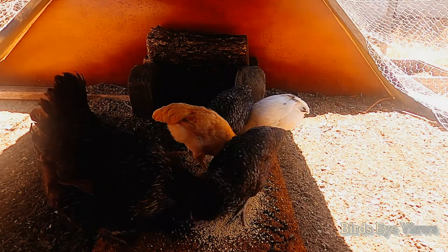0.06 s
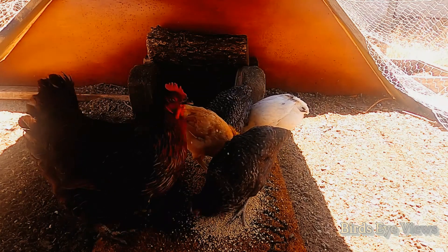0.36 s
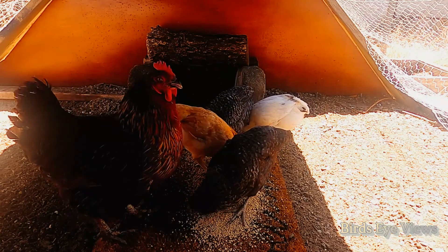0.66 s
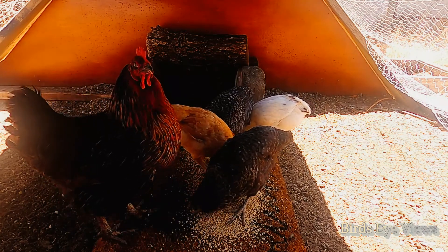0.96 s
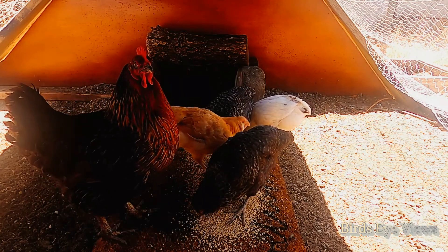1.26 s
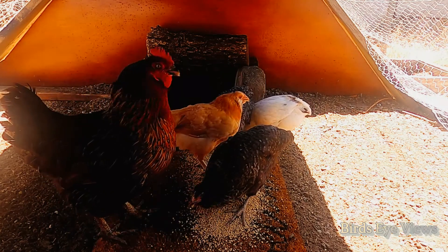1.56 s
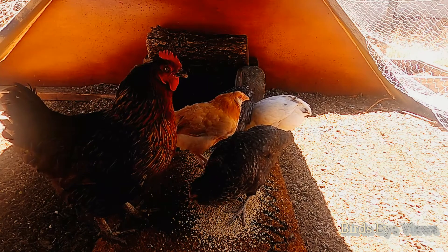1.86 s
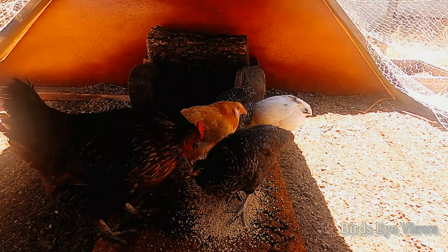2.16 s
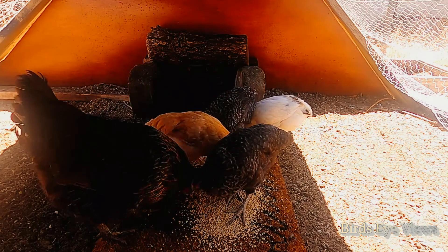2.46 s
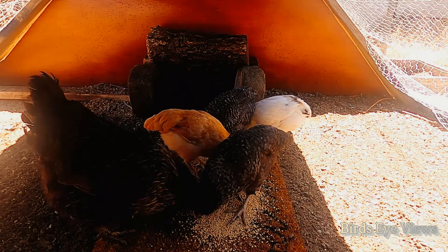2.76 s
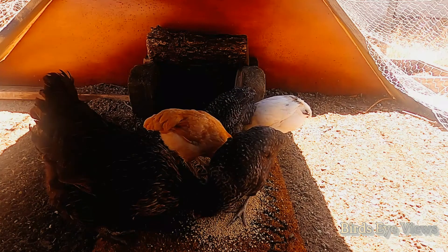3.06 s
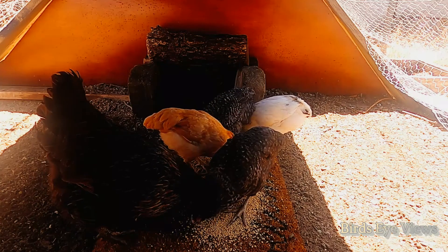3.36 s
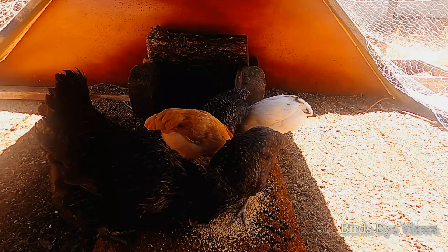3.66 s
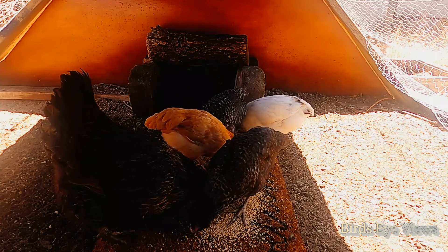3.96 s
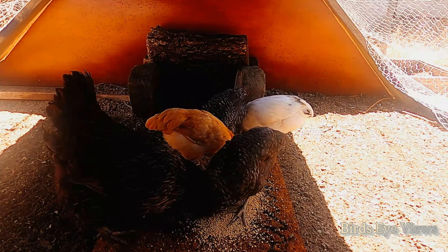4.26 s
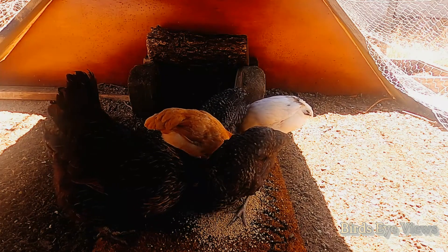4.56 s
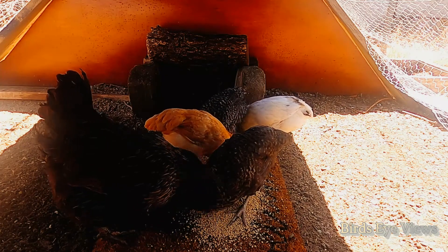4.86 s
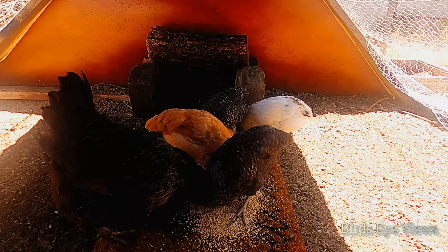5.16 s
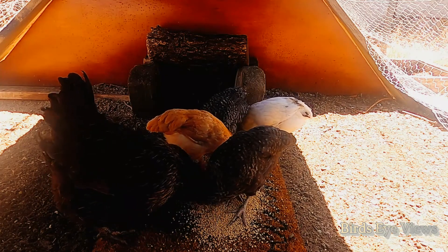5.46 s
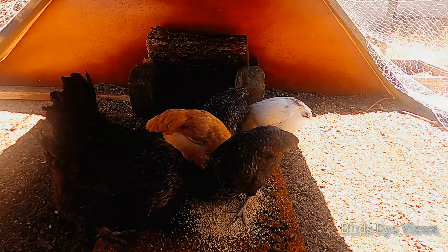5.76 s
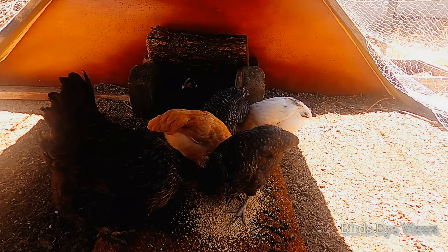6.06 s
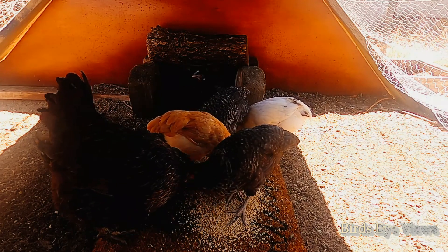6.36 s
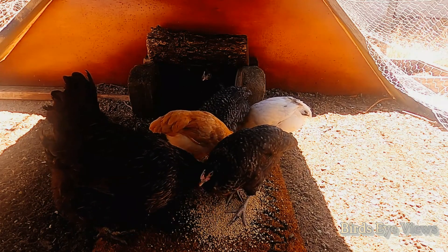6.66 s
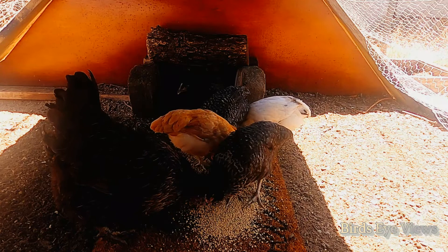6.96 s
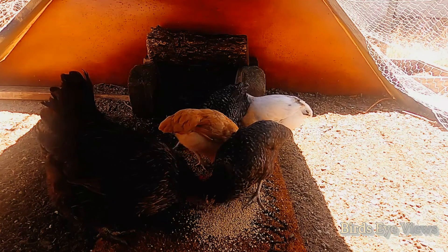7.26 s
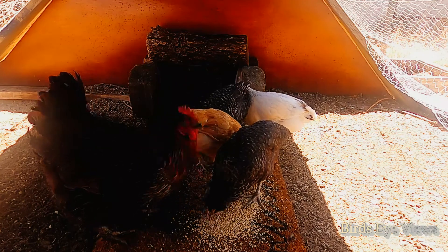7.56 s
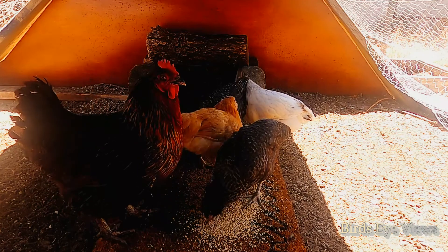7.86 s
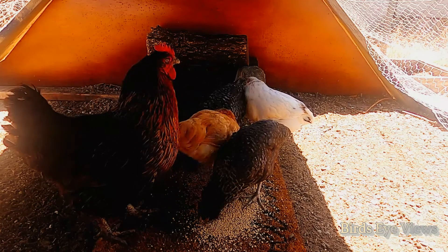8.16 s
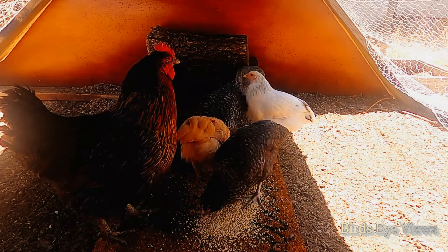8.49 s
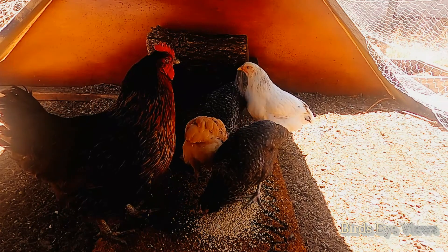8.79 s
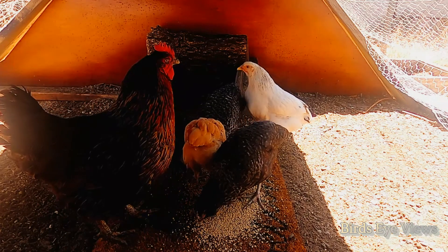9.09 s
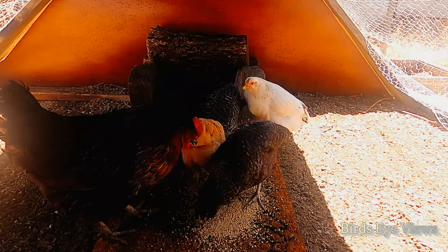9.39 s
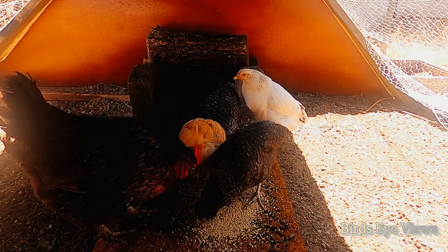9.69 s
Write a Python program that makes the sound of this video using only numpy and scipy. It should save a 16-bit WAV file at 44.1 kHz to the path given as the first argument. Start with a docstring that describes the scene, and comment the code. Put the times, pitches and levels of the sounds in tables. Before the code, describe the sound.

A hen and her half-grown chicks feed in a small outdoor shelter, over a steady low rumble. The hen, close by, opens with two short falling pips, the second, at 0.5 seconds, the loudest. Until about 4 seconds a softer chick, farther in and slightly echoing, alternates falling slurs with rising whistles. The hen gives a raspy pip at 4.3 seconds and another pip at 6. Level whistles and quavering murmurs fill 4.5 to 6.5 seconds, followed by a run of sinking, sigh-like chick notes around 7. A beak knocks on the hollow feeder at 7.7 seconds. From 8 seconds to the end, near 10, a chick repeats quick upturned notes, while the hen pips three times around 8 to 8.5 and once more at 9.6. Sharp peeps, chirps, light beak ticks and faint scratching of feet in grit are scattered throughout.

```python
"""A hen and her half-grown chicks feed under a tarp shelter that smears every call, over a low rumble.
The hen opens with two short falling pips; for four seconds a chick alternates slurs and rising whistles.
A rasping pip follows, then level whistles, quavering murmurs and, near 7 s, a run of sinking sighs.
A beak knocks hard on the feeder, and the hen pips on through a closing run of quick upturned notes.
Sharp peeps, chirps, beak ticks and feet scratching the grit are scattered throughout."""
import sys
import numpy as np
from scipy import signal
from scipy.fft import rfft, irfft, next_fast_len
from scipy.io import wavfile
from scipy.ndimage import uniform_filter1d

SR = 44100
rng = np.random.default_rng(int(sys.argv[2]) if len(sys.argv) > 2 else 0)


def generate_wav(sig):
    """Save sig (samples, or channels by samples) to the path in sys.argv[1] as 16-bit PCM at SR."""
    pcm = np.round(np.clip(np.atleast_2d(sig).T, -1, 1) * 32767).astype(np.int16)
    wavfile.write(sys.argv[1], SR, pcm)


N = 433503
T = np.arange(N) / SR
SHARE = np.linspace(0, 1, 100)  # position along a call, as a share of its length
LEFT_LAG_S = 5.5e-5  # sound arrives on the right first

# spectrum of the outdoor air: frequency_hz, density_db
AIR_SPECTRUM = [(20, -20.5), (30, -7.5), (45, -4.5), (62, -3), (79, 2), (97, -3), (120, -5), (160, -14),
                (220, -22.5), (350, -31.5), (700, -31), (980, -24), (1200, -29), (1600, -29.5), (2200, -36),
                (3300, -42.5), (5000, -53.5), (7000, -55), (10000, -78), (15000, -80)]
# likeness of the air's sound on left and right: frequency_hz, coherence_ratio
AIR_COHERENCE = [(60, 1), (150, 0.95), (350, 0.72), (860, 0.55), (2080, 0.46), (5060, 0.02)]
# slow course of the rumble: time_s, level_db
RUMBLE_LEVELS = [(0.0, -48), (0.24, -47.5), (4.02, -46.5), (7.09, -49.5), (7.2, -47), (9.83, -48.5)]
# slow course of the hush: time_s, level_db
HUSH_LEVELS = [(0.0, -64.5), (2.6, -65), (3.37, -62.5), (6.65, -68.5), (7.47, -66), (9.83, -69)]
# reflections from walls and ground: delay_s, left_db, right_db
ECHOES = [(.0042, -13.5, -24.5), (.0095, -16, -14), (0.0117, -6.5, -9), (.023, -23.5, -26.5)]
# reverberation time of the shelter: frequency_hz, t60_s
SHELTER_DECAY = [(300, 0.69), (1300, 0.47), (3000, 0.36), (5000, 0.27), (10000, 0.2)]
# spectrum of stirring litter: frequency_hz, gain_db
LITTER_SPECTRUM = [(500, -8), (3000, 3), (8000, 1.5), (11000, -9), (14000, -13)]
# dull shuffles on packed earth: start_s, level_db
SHUFFLES = [(1.56, -67), (2.73, -64), (2.98, -60.5), (3.58, -64), (4.58, -64.5), (5.679, -61)]
# spectrum of scuffed earth: frequency_hz, gain_db
EARTH_SPECTRUM = [(100, -21.5), (290, 0), (480, -5.5), (700, -12), (1500, -10), (6000, -60)]
# feet in the grit: start_s, length_s, level_db
SCRATCHES = [(0.85, 0.046, -76), (2.716, 0.084, -70), (4.584, 0.065, -73.5), (5.068, 0.041, -73),
             (5.593, 0.13, -77.5), (6.466, 0.076, -74), (6.991, 0.14, -74), (7.162, 0.042, -81),
             (7.318, 0.083, -75), (7.653, 0.053, -72), (8.03, 0.037, -64.5), (8.566, 0.036, -76)]
# spectrum of ticks and scratches: frequency_hz, gain_db
GRIT_SPECTRUM = [(200, -13), (700, 10.5), (2500, 7), (5000, 5), (7500, -0.5), (10000, -6), (14000, -19.5)]
# beak knocks on the feeder: start_s, level_db, ring_ratio
PECKS = [(.697, -64, 0.039), (1.08, -61, 0.045), (1.512, -54.5, .05), (4.597, -59, 0.34),
         (7.2069, -57, 1.36), (7.34, -55.5, .05), (7.717, -48.5, 0.29), (8.127, -62, 0.26)]
# modes of the hollow feeder: frequency_hz, gain_db, t60_s
FEEDER_MODES = [(520, -13, 0.036), (947, 6, 0.031), (1090, 8.5, 0.029), (1230, 1, 0.048), (2300, -14, .025)]
# spectrum of the breath in a chick's call: frequency_hz, gain_db
BREATH_SPECTRUM = [(100, -24), (280, -5.5), (500, 1.5), (750, 1), (1200, 5), (3000, 3.5), (4800, -12),
                   (6000, -13), (9000, -29.5), (14000, -47.5)]
# falling slurs: start_s, level_db
SLURS = [(.405, -62.5), (0.955, -66), (1.565, -63.5), (2.14, -62.5), (2.714, -59.5), (3.348, -54),
         (4.034, -65.5)]
# long rising whistles: start_s, top_pitch_hz, level_db
RISES = [(.56, 3160, -63.5), (1.106, 3160, -59.5), (1.722, 3176, -61), (2.288, 3200, -55.5),
         (2.878, 3265, -51.5), (3.506, 3195, -53), (4.06, 3040, -61.5)]
# low quavering murmurs: start_s, level_db
MURMURS = [(5.275, -53.5), (5.655, -58), (6.048, -63.5), (6.45, -62.5)]
# sinking sighs: start_s, level_db
SIGHS = [(6.697, -59.5), (6.925, -59.5), (7.153, -64), (7.39, -64), (7.637, -64), (7.897, -59)]
# level notes that flick up at the end: start_s, level_db
HOOKS = [(8.149, -59), (8.317, -57.5), (8.484, -60), (8.67, -52), (8.833, -53), (9.017, -53),
         (9.203, -51.5), (9.388, -54), (9.568, -55), (9.785, -56)]
# sharp peeps: start_s, top_pitch_hz, level_db
PEEPS = [(0.089, 5140, -61), (1.499, 4730, -63), (1.991, 5260, -62), (2.996, 4880, -60.5),
         (3.421, 5200, -60.5), (5.024, 5350, -56.5), (6.46, 5150, -55), (7.911, 5090, -53.5),
         (9.116, 5230, -54)]
# level whistles: start_s, length_s, pitch_hz, level_db
WHISTLES = [(.295, 0.052, 3480, -57.5), (.392, 0.047, 4290, -52.5), (2.199, 0.076, 4000, -62.5),
            (4.46, 0.082, 2500, -60), (4.555, 0.056, 4450, -64), (4.562, 0.097, 3120, -54),
            (4.783, 0.044, 4440, -61.5), (4.898, 0.054, 2438, -56.5), (5.022, 0.047, 3230, -52.5),
            (5.504, 0.086, 4380, -54.5), (5.884, 0.13, 4445, -59.5), (5.983, 0.047, 2865, -59),
            (6.283, 0.12, 4460, -59.5), (9.31, .16, 3340, -66), (9.49, 0.096, 3366, -66),
            (9.69, .08, 3390, -72.5)]
# louder chirps: start_s, length_s, top_pitch_hz, level_db
CHIRPS = [(-.01, 0.095, 3734, -58.5), (.022, 0.054, 2937, -55), (.785, 0.052, 4710, -69.5),
          (1.304, 0.067, 4580, -64), (1.648, 0.039, 4210, -66), (1.79, .064, 4380, -61),
          (2.27, 0.077, 3950, -65.5), (2.71, 0.064, 4600, -65), (2.724, 0.079, 3680, -70),
          (3.329, 0.043, 4630, -66.5), (3.489, 0.051, 4080, -56.5), (3.635, 0.066, 4520, -64.5),
          (3.71, 0.051, 4470, -62.5), (3.874, 0.046, 4360, -57.5), (3.906, 0.041, 3460, -59.5),
          (4.016, 0.067, 4410, -60.5), (4.209, 0.052, 4400, -62.5), (4.329, 0.052, 4380, -60),
          (4.916, 0.058, 4100, -69), (4.928, 0.043, 3340, -55.5), (5.075, 0.067, 4180, -59),
          (5.298, .06, 4050, -61.5), (5.509, 0.066, 3970, -63.5), (5.7, 0.06, 4200, -68),
          (5.87, 0.072, 4460, -68), (6.23, 0.17, 4290, -66.5), (7.251, 0.053, 4140, -69),
          (7.999, 0.028, 4090, -61.5), (8.689, 0.17, 4610, -71.5), (8.951, 0.055, 4010, -60.5),
          (9.19, 0.066, 3920, -62), (9.349, 0.1, 4320, -69)]
# the hen's pips: start_s, length_s, open_hz, close_hz, level_db, open_rasp_ratio, close_rasp_ratio
PIPS = [(0.062, 0.034, 1560, 1476, -35.5, .3, 0.03), (0.475, 0.038, 1692, 1307, -28, 0.22, 0.24),
        (4.325, 0.041, 1580, 1336, -38.5, 0.98, 0.94), (5.977, 0.036, 1570, 1414, -40.5, .15, 0.21),
        (7.84, 0.061, 1244, 1186, -39, .12, 0.35), (8.018, .044, 1776, 1406, -35.5, 0.41, 0.18),
        (8.47, 0.082, 1425, 1166, -43, 0.72, 0), (9.576, 0.063, 1399, 1366, -39.5, 0.18, 0.14)]
# the hen's harmonics, from the second upward: gain_db
HEN_OVERTONES = [-30, -42, -44, -48]


def amp(db):
    """Amplitude grows tenfold for every 20 dB."""
    return 10 ** (np.asarray(db) / 20)


def unit(x):
    """Normalisation to an rms of 1."""
    return x / np.sqrt(np.mean(x ** 2) + 1e-20)


def read(points, hz):
    """Interpolation of a table on a logarithmic frequency axis."""
    f, value = np.transpose(points)
    return np.interp(np.log(hz + 1), np.log(f + 1), value)


def add(mix, start_s, sound):
    """Superposition: a sound sums into the mix from its start time."""
    at = round(start_s * SR)
    sound = sound[max(-at, 0):]
    part = mix[max(at, 0):][:len(sound)]
    part += sound[:len(part)]


def wander(size, hz):
    """Low-passed noise: smooth random motion of rms about 1 that rolls off near hz."""
    f = np.fft.rfftfreq(16384, 1 / SR)
    return unit(irfft(rfft(rng.standard_normal(16384)) * np.exp(-(f / hz) ** 2)))[:size]


def colour(x, points):
    """Linear filtering: the spectrum is multiplied by a table's gain curve."""
    size = next_fast_len(N)
    return irfft(rfft(x, size) * amp(read(points, np.fft.rfftfreq(size, 1 / SR))), size)[..., :N]


def outdoors(hush_db=1, gust_db=2, buffet=0.54):
    """Partly coherent noise, split at 300 Hz into a lumpy rumble and a faint hush."""
    size = next_fast_len(N)
    hz = np.fft.rfftfreq(size, 1 / SR)
    common, separate = rfft(rng.standard_normal((2, size)))
    # the lowest buffeting differs between the two sides
    coherence = np.clip(read(AIR_COHERENCE, hz) - buffet * np.exp(-(hz / 35) ** 2), 0, 1)
    left = common * np.exp(-2j * np.pi * hz * LEFT_LAG_S)
    right = coherence * common + np.sqrt(1 - coherence ** 2) * separate
    air = np.array([left, right]) * amp(read(AIR_SPECTRUM, hz))
    low = 1 / (1 + (hz / 300) ** 6)
    rumble, hush = (irfft(air * band, size)[:, :N] for band in (low, 1 - low))
    midband_rms = irfft(air[0] * (hz > 400) * (hz < 1100), size).std()
    gust_band = (hz > 2) * np.exp(-(hz / 9) ** 2)
    gusts = unit(irfft(rfft(rng.standard_normal(size)) * gust_band, size))[:N]
    rumble_gain = amp(gust_db * gusts + np.interp(T, *np.transpose(RUMBLE_LEVELS)))
    hush_gain = amp(hush_db + np.interp(T, *np.transpose(HUSH_LEVELS)))
    return unit(rumble) * rumble_gain + hush / midband_rms * hush_gain


def shelter(x, wet_db, left_db, scatter_db, scatter_s=0.012):
    """Convolution with direct sound, wall echoes, scatter off the clutter and a short diffuse tail."""
    size = SR // 2
    t = np.arange(size) / SR
    hz, frame_s, spectra = signal.stft(rng.standard_normal((2, size)) * (t > .006), SR, nperseg=256)
    decay = amp(-60 * frame_s / read(SHELTER_DECAY, hz)[:, None])
    tail = signal.istft(spectra * decay, SR, nperseg=256)[1][:, :size]
    scatter = rng.standard_normal((2, size)) * np.exp(-t / scatter_s) * (t > .001)
    response = (amp(wet_db) * unit(tail) + amp(scatter_db) * unit(scatter)) / np.sqrt(size)
    response[[0, 1], [round(LEFT_LAG_S * SR), 0]] += 1  # direct path
    for delay_s, *sides_db in ECHOES:
        response[:, round(delay_s * SR)] += amp(sides_db)
    return signal.oaconvolve(x[None], response, axes=1)[:, :N] * amp([[left_db / 2], [-left_db / 2]])


def rustle(grains_per_s=740, level_db=-91, swell_db=1.5):
    """Shot noise: fine grains of litter stir under the birds in slow clumps."""
    grains = rng.standard_normal(N) * (rng.random(N) < grains_per_s / SR)
    clumps = unit(uniform_filter1d(rng.standard_normal(N), size=6000))
    return amp(level_db) * unit(colour(grains * amp(swell_db * clumps), LITTER_SPECTRUM))


def shuffling():
    """Friction noise: feet push the soil in short soft scuffs."""
    push = np.zeros(N)
    scuff = np.hanning(int(.12 * SR))
    for start_s, db in SHUFFLES:
        add(push, start_s, amp(db) * scuff)
    return push * unit(colour(rng.standard_normal(N), EARTH_SPECTRUM))


def feeding(grit_per_s=1200, strays_per_s=7, stray_db=-80):
    """Impact excitation: beaks ring the feeder's damped modes, feet shift grit and stray grains drop."""
    ticks, rings = np.zeros(N), np.zeros(N)
    t = np.arange(4096) / SR
    snap = np.exp(-t / .0022)
    ring = sum(amp(db - 60 * t / t60) * np.sin(2 * np.pi * hz * t) for hz, db, t60 in FEEDER_MODES)
    for start_s, db, ring_ratio in PECKS:
        add(rings, start_s, amp(db) * ring_ratio * ring)
        add(ticks, start_s, amp(db) * snap * rng.standard_normal(len(t)))
    for start_s, length_s, db in SCRATCHES:
        size = int(length_s * SR)
        grains = rng.standard_normal(size) * (rng.random(size) < grit_per_s / SR)
        add(ticks, start_s, amp(db) * unit(grains * np.hanning(size)))
    drops = rng.random(N) < strays_per_s / SR
    strays = drops * amp(stray_db + 2 * np.minimum(rng.exponential(3.0, N), 5))
    ticks += signal.oaconvolve(strays, snap * rng.standard_normal(len(t)))[:N]
    return colour(ticks, GRIT_SPECTRUM) + rings


def glide(turn, scoop, slide, ease):
    """Pitch contour: a factor that reaches 1 at the share turn, then slides off, early if ease < 1."""
    before = np.maximum(1 - SHARE / turn, 0)
    after = np.maximum((SHARE - turn) / (1 - turn), 0)
    return 1 - scoop * before ** 2 + slide * after ** ease


def swell(attack, release, start_db, end_db):
    """Amplitude envelope in dB, with attack and release as shares of the call's length."""
    onset = np.maximum(1 - SHARE / attack, 0)
    ending = np.maximum(1 - (1 - SHARE) / release, 0)
    return start_db * onset ** 2 + end_db * ending ** 2


def chick(calls, bend, swell_db, jitter, flutter_db, rough, breath_db, octave_db, quaver=.015):
    """Frequency and amplitude modulation: whistles waver about one contour, with breath noise."""
    lead_s, lead_db = .03, -12  # the voice builds up faintly and unsteadily before the note
    voice, envelope = np.zeros((2, N))
    for start_s, length_s, hz, db in calls:
        t = np.arange(-lead_s, length_s, 1 / SR)
        size = len(t)
        early = np.clip(-t / lead_s, 0, 1)
        contour = uniform_filter1d(np.interp(t / length_s, SHARE, bend), size=200)
        waver = jitter * wander(size, 200) + (quaver + 0.0407 * early) * wander(size, 29.6)
        phase = 2 * np.pi * np.cumsum(hz * contour * (1 + waver)) / SR
        effort_db = db + np.interp(t / length_s, SHARE, swell_db) + lead_db * early
        level = amp(effort_db + flutter_db * wander(size, 70)) * signal.windows.tukey(size, .15)
        tone = np.sin(phase) * (1 + rough * wander(size, 620)) + amp(octave_db) * np.sin(2 * phase)
        add(voice, start_s - lead_s, level * unit(tone))
        add(envelope, start_s - lead_s, level)
    breath = unit(colour(rng.standard_normal(N), BREATH_SPECTRUM))
    return voice + amp(breath_db) * breath * envelope


def twitter(per_s=0.86, length_s=.06, pitch_hz=4260, spread=0.14, level_db=-72):
    """Uniform scatter in time and pitch: rows like CHIRPS for further, fainter chirps."""
    draws = rng.random((round(per_s * N / SR), 2))
    return [(when * N / SR, length_s, pitch_hz * (1 + spread * (2 * height - 1)), level_db)
            for when, height in draws]


def repeated(notes, length_s, pitch_hz):
    """Repetition of one note: rows of start_s, length_s, pitch_hz, level_db."""
    return [(start_s, length_s, pitch_hz, db) for start_s, db in notes]


def soft_calls(rise_s=.18):
    """Gliding tones near 3 kHz: the contented low whistling of the feeding chicks."""
    slurs = chick(repeated(SLURS, length_s=.088, pitch_hz=2817),
                  glide(turn=.122, scoop=.0217, slide=-.22, ease=.8),
                  swell(attack=.35, release=.23, start_db=-8, end_db=-5.5),
                  jitter=.035, flutter_db=4.5, rough=.37, breath_db=-5.5, octave_db=-47.5)
    hushed_db = -6.5 * (SHARE < .32)  # a rise starts hushed, then snaps to full voice
    rises = chick([(s, rise_s, hz, db) for s, hz, db in RISES],
                  glide(turn=.84, scoop=.33, slide=.0064, ease=.9),
                  swell(attack=.25, release=.68, start_db=-11.5, end_db=-12.5) + hushed_db,
                  jitter=.011, flutter_db=4, rough=.16, breath_db=-11.5, octave_db=-43, quaver=.0035)
    murmurs = chick(repeated(MURMURS, length_s=.15, pitch_hz=2670),
                    glide(turn=.2, scoop=.0493, slide=-.17, ease=.24),
                    swell(attack=.56, release=.24, start_db=-8.5, end_db=-10.5),
                    jitter=.0278, flutter_db=3.5, rough=.34, breath_db=-12.5, octave_db=-34)
    sighs = chick(repeated(SIGHS, length_s=.138, pitch_hz=3060),
                  glide(turn=.0682, scoop=.2, slide=-.3, ease=.61),
                  swell(attack=.56, release=.33, start_db=-8.5, end_db=-6),
                  jitter=.0362, flutter_db=4.5, rough=.38, breath_db=-7.5, octave_db=-47)
    hooks = chick(repeated(HOOKS, length_s=.08, pitch_hz=2533),
                  glide(turn=.66, scoop=-.0298, slide=.273, ease=1.474),
                  swell(attack=1, release=.2, start_db=-15, end_db=-9),
                  jitter=.014, flutter_db=2.5, rough=.23, breath_db=-13, octave_db=-34, quaver=.0061)
    return slurs + rises + murmurs + sighs + hooks


def high_calls(peep_s=.078, squeak_lead_s=.023, squeak_s=.04, squeak_hz=7580, squeak_db=-16.5):
    """Biphonation: a thin second voice slides up just ahead of each peep, among whistles and chirps."""
    peeps = chick([(s, peep_s, hz, db) for s, hz, db in PEEPS],
                  glide(turn=.35, scoop=.35, slide=-.48, ease=1),
                  swell(attack=.19, release=1, start_db=-8.5, end_db=-2.5),
                  jitter=.019, flutter_db=1, rough=.44, breath_db=-11.5, octave_db=-29.5, quaver=.005)
    squeaks = chick([(s - squeak_lead_s, squeak_s, squeak_hz, db + squeak_db) for s, _, db in PEEPS],
                    glide(turn=.99, scoop=.17, slide=.01, ease=1.1),
                    swell(attack=.18, release=.73, start_db=-6.5, end_db=-7),
                    jitter=.016, flutter_db=1, rough=.68, breath_db=-19, octave_db=-49)
    whistles = chick(WHISTLES,
                     glide(turn=.35, scoop=.0407, slide=.0065, ease=1.1),
                     swell(attack=.23, release=.77, start_db=-15.5, end_db=-9),
                     jitter=.014, flutter_db=2, rough=.23, breath_db=-8, octave_db=-30, quaver=.0089)
    chirps = chick(CHIRPS + twitter(),
                   glide(turn=.178, scoop=.042, slide=-.28, ease=.74),
                   swell(attack=.24, release=.88, start_db=-10.5, end_db=-4),
                   jitter=.023, flutter_db=4, rough=.69, breath_db=-6.5, octave_db=-31, quaver=.037)
    return peeps + squeaks + whistles + chirps


def hen(length_s, open_hz, close_hz, level_db, open_rasp, close_rasp):
    """Period tripling: a whistle breaks downward; in a rasp every third cycle is strong."""
    break_share, break_s = .395, .0051  # where the pitch drops, and how quickly
    attack_s, release_s, flutter_db = .032, .03, 2
    jitter, rasp_depth, subharmonic_db = .012, .86, -14
    strain_db_per_octave = -16.5  # the high opening is weaker than the close
    t = np.arange(0, length_s, 1 / SR)
    dropped = .5 + .5 * np.tanh((t - break_share * length_s) / break_s)
    hz = open_hz + (close_hz - open_hz) * dropped
    rasp = open_rasp + (close_rasp - open_rasp) * dropped
    effort_db = swell(attack_s / length_s, release_s / length_s, start_db=-13.5, end_db=-13.5)
    db = level_db + np.interp(t / length_s, SHARE, effort_db) + flutter_db * wander(len(t), 110)
    db += strain_db_per_octave * np.log2(hz / close_hz)
    waver = (jitter + .097 * rasp) * wander(len(t), 380)
    phase = 2 * np.pi * np.cumsum(hz * (1 + waver)) / SR
    overtones = sum(amp(gain_db) * np.sin(k * phase) for k, gain_db in enumerate(HEN_OVERTONES, 2))
    subharmonic = np.cos(phase / 3)
    chop = np.exp(rasp_depth * rasp * subharmonic) / np.sqrt(np.i0(2 * rasp_depth * rasp))  # unit power
    grain = 1 + .07 * wander(len(t), 900)
    voice = (np.sin(phase) + overtones) * chop * grain + amp(subharmonic_db) * rasp * subharmonic
    return amp(db) * unit(voice) * signal.windows.tukey(len(t), .1)


def scene():
    """Direct-to-reverberant ratio sets distance: the hen is close, the chicks deeper in the shelter."""
    pips = np.zeros(N)
    for start_s, *pip in PIPS:
        add(pips, start_s, hen(*pip))
    return (shelter(pips, wet_db=-18.5, left_db=1, scatter_db=-5)
            + shelter(soft_calls(), wet_db=0, left_db=2.5, scatter_db=1)
            + shelter(high_calls(), wet_db=-1.5, left_db=5, scatter_db=-7)
            + shelter(feeding() + shuffling() + rustle(), wet_db=-10, left_db=0, scatter_db=-.5)
            + outdoors())


def record(dry):
    """Band limiting: a linear-phase low-pass filter removes the treble above 14.5 kHz."""
    lowpass = signal.firwin(255, 14500, window=("kaiser", 8), fs=SR)
    return signal.oaconvolve(dry, lowpass[None], "same")


dry = scene()
out = record(dry)
generate_wav(out)
```